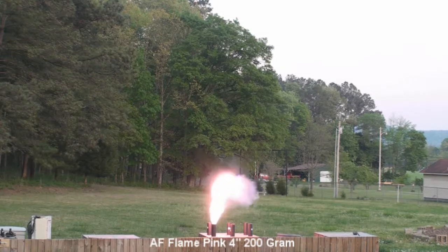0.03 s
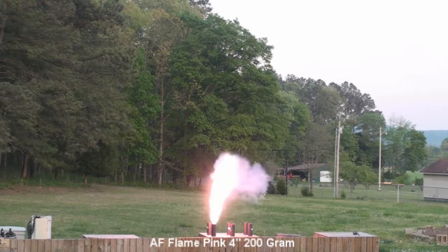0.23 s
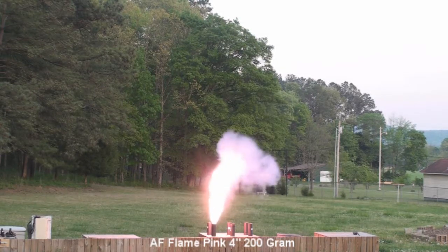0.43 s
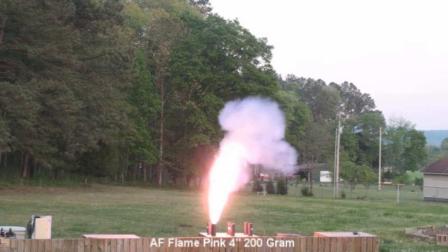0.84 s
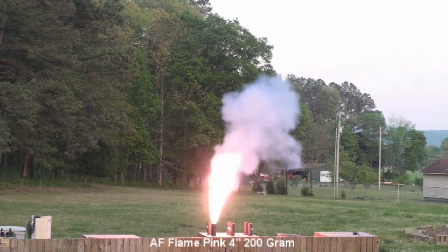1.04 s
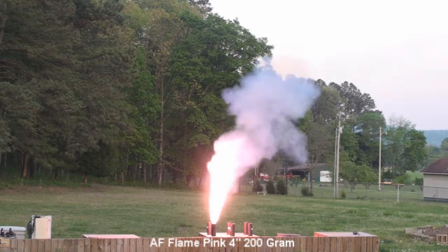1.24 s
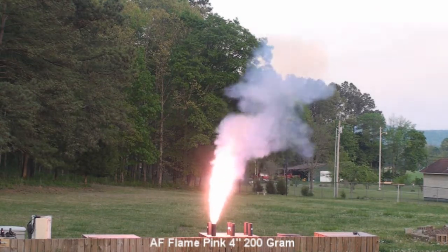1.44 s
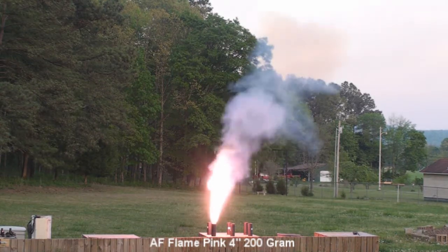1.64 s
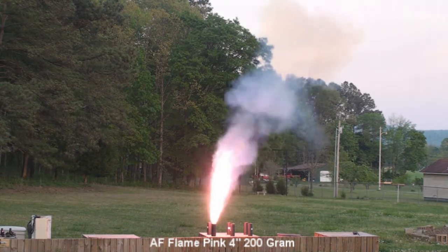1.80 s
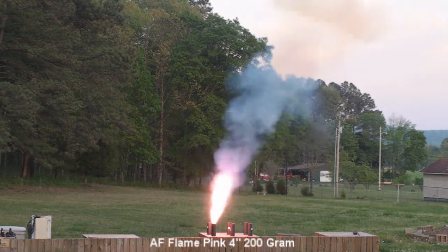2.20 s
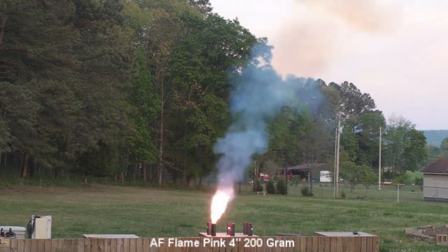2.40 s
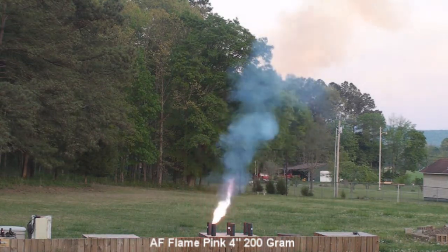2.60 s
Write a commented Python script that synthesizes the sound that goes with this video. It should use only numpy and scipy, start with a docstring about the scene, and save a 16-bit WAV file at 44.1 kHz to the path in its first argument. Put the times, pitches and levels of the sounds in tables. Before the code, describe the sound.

A firework flame whooshes and sizzles outdoors, puffing over a low rumble before fading.

```python
"""A pyrotechnic flame pot fires in a grassy yard, over a bed of outdoor air. A distant insect's trill
is faintly heard before the jet swells: the nozzle rushes and the burning powder sizzles.
For two seconds the burning gas roars low and puffs unevenly above the rumble of the fireball,
while a breeze bumps the left microphone port. As the flame dies, the trill is audible again."""
import sys
import numpy as np
from scipy.fft import rfft, irfft, next_fast_len
from scipy.io import wavfile
from scipy.ndimage import map_coordinates

SR = 44100
rng = np.random.default_rng(int(sys.argv[2]) if len(sys.argv) > 2 else 0)


def store_pcm(level_fs):
    """Save levels as 16-bit WAV."""
    pcm = np.round(np.clip(level_fs, -1, 1) * 32767).astype(np.int16)
    wavfile.write(sys.argv[1], SR, np.atleast_2d(pcm).T)


N = 121275


def roar(surges, surging, gain_db=2.5, duck=.6, weak_db=-30, weak_range_db=16, dull_hz=240):
    """Turbulent burning: a low roar that gathers into puffs and turns duller while the flame is weak."""
    # envelope of the roar (time [s], relative level [dB])
    envelope = [(0, -53), (.12, -39.5), (.22, -35), (.32, -25.5), (.44, -25), (.6, -21), (.73, -28),
                (.9, -22.5), (1.1, -25.5), (1.28, -19), (1.45, -25), (1.6, -22.5), (1.78, -21.5),
                (1.96, -21.5), (2.03, -30), (2.14, -23.5), (2.3, -34), (2.45, -32), (2.54, -45),
                (2.62, -41), (2.75, -55)]
    # tone of the burning gas (frequency [Hz], relative level [dB])
    spectrum = [(20, -38), (60, -47), (85, -26.5), (105, -9.5), (135, 2.5), (190, -8.5), (240, -5),
                (320, -16.5), (370, -14.5), (480, -17.5), (530, -23.5), (800, -58), (1500, -100)]
    level_db = curve(envelope)
    churn = amp(level_db + gain_db) * (1 - duck * surging) * noise(spectrum)
    weak = np.clip((weak_db - level_db) / weak_range_db, 0, 1)
    dull = filtered(churn, lambda hz: 1 / (1 + (hz / dull_hz) ** 4))
    left, right = at_ports(churn + weak * (dull - churn) + surges)
    left_dip_db = .4 * np.minimum(level_db - np.median(level_db), 0)  # a quiet roar leans right
    return np.array([left * amp(left_dip_db), right])


def puffs(gain_db=-4):
    """Gas surges in a few steep pressure swings. Returns the sound and a 0-1 envelope of the surges."""
    # surges of burning gas (onset [s], relative level [dB], pitch at the crest [Hz], attack [s],
    # pitch fall [Hz/s], share of the octave [0-1])
    hits = [(0.269, -18, 113.5, 0.048, 200, 0.12), (0.323, -19.5, 245, 0.027, -400, 0),
            (.478, -11, 105, .022, 0, 0.33), (.545, -14, 126, 0.021, -300, 0.032),
            (0.599, -14, 116.5, 0.017, 100, 1), (.671, -16, 126, 0.0095, 0, 1),
            (0.767, -13, 150, 0.0088, 0, 0.53), (0.81, -4, 148, .0096, 0, 0.17),
            (0.874, -11.5, 152, 0.009, 0, 0.67), (0.937, -9.5, 130.7, .012, 300, 0.6),
            (1.024, -5, 130, 0.0085, 600, 0.56), (1.067, -12, 125, 0.0063, 300, 1),
            (1.193, -6.5, 134.4, 0.014, 102, 0.37), (1.229, -15, 241.4, 0.026, 1900, 0),
            (1.325, -6, 137, 0.0082, 0, 0.27), (1.52, -4.5, 150, 0.0095, 0, 0.28),
            (1.581, -10, 123, 0.0078, 300, 1), (1.63, -8, 146, .009, -300, 0.41),
            (1.671, -11.5, 133.5, 0.012, 0, 0.96), (1.735, -8, 136, 0.01, 300, 0.47),
            (1.738, -19, 253, 0.03, 900, 0.21), (1.768, -9, 122.4, 0.022, 600, 0.17),
            (1.874, -14, 135, 0.013, 0, 0.14), (1.922, -16, 142, 0.0096, 0, 0.35),
            (1.947, -14, 248.5, 0.012, 2403, 0.23), (2.077, -19, 207, .031, 1700, 0.21),
            (2.41, -15.5, 141, 0.0061, 900, 0.36)]
    sound, surging = np.zeros((2, N + SR))
    t = np.arange(SR // 4) / SR
    start_phases = rng.uniform(0, 2 * np.pi, len(hits))
    for (onset, db, hz, attack, fall, octave), start_phase in zip(hits, start_phases):
        swell = (t / attack * np.exp(1 - t / attack)) ** 2
        phase = 2 * np.pi * np.cumsum(hz - fall * (t - attack)) / SR + start_phase
        swing = np.sin(phase) - octave * swell * np.sin(2 * phase)  # the octave steepens the front
        start = round(onset * SR)
        sound[start:start + len(t)] += amp(db + gain_db) * swell * swing
        surging[start:start + len(t)] += np.sqrt(swell)
    return np.array([sound[:N], np.zeros(N)]), np.minimum(surging[:N], 1)


def rush(flicker, surging, gain_db=2.5, flicker_db=0.85, surge_db=0.6):
    """Gas streams from the nozzle, flickering and pushing a little harder in each surge."""
    # envelope of the jet (time [s], relative level [dB])
    envelope = [(0, -81), (.1, -60), (.2, -46.5), (.34, -40.5), (.6, -37.5), (.74, -37), (1.03, -34.5),
                (1.25, -35.5), (1.45, -34), (1.75, -36.5), (2.0, -37.5), (2.18, -39), (2.32, -44.5),
                (2.44, -44.5), (2.54, -52.5), (2.75, -62)]
    # tone of the jet (frequency [Hz], relative level [dB])
    spectrum = [(250, -54), (530, -7.5), (620, -1), (780, -2.5), (1000, 0.5), (1400, -5.5), (1900, -10.5),
                (2300, -20), (3100, -14), (3900, -18), (4400, -26.5), (8000, -28.5), (16000, -102)]
    level_db = curve(envelope) + gain_db + flicker_db * flicker + surge_db * surging
    return at_ports(amp(level_db) * noise(spectrum))


def sizzle(flicker, gain_db=1.5, flicker_db=0.76, grain_db=0.75):
    """Burning powder puts a fine, slightly grainy hiss on top."""
    # envelope of the sizzle (time [s], relative level [dB])
    envelope = [(0, -66), (.12, -57), (.35, -54.5), (.62, -54), (.75, -53), (1.15, -50.5), (1.65, -50.5),
                (2.05, -51.5), (2.45, -53), (2.58, -57.5), (2.75, -66)]
    # tone of the burning powder (frequency [Hz], relative level [dB])
    spectrum = [(1500, -59), (4000, 0), (5500, 2.5), (7000, -3.5), (10500, -5.5), (12500, -7.5),
                (15500, -17)]
    level_db = curve(envelope) + gain_db + flicker_db * flicker + grain_db * wobble(600)
    return at_ports(amp(level_db) * noise(spectrum))


def rumble(left_db=-12):
    """The rising fireball fills out the low end for as long as it burns."""
    # envelope of the rumble on the right (time [s], level [dB])
    envelope = [(0, -67), (.13, -43), (.33, -35), (.7, -42), (.9, -41), (1.3, -39.5), (1.95, -31),
                (2.25, -40), (2.46, -34), (2.65, -57), (2.75, -52)]
    # tone of the fireball (frequency [Hz], relative level [dB])
    spectrum = [(15, -21), (30, 4), (50, 1), (85, 3), (120, 2), (200, -31), (600, -82)]
    return amp(curve(envelope)) * amp([[left_db], [0]]) * noise(spectrum)


def at_ports(pair):
    """The right port hears the first signal; the left hears it shifted, with the second as scatter."""
    # the flame at the left port against the right
    # (frequency [Hz], level [dB], likeness [0-1], phase lead [rad])
    image = [(50, -5, .4, 3.9), (105, -8, .9, 3.6), (135, -8, .8, 2.4), (200, -2, .4, .6),
             (240, -6, .65, 1.3), (275, -2, .9, .6), (320, 4, .3, 0), (380, -4, .4, 0), (480, -5, .45, 1.6),
             (620, -3.5, .8, .4), (1000, -4.7, .86, -.1), (1900, -5.5, .7, .3), (2350, -5, .4, .5),
             (3100, -4.7, .88, .2), (4400, -7, .35, .2), (5500, -6, .62, .2), (7000, -7, .22, 0),
             (10800, 2.5, .52, .4), (12500, -16, .46, 0)]

    def response(hz):
        likeness = np.clip(along(image, hz, column=2), 0, 1)
        direct = likeness * np.exp(1j * along(image, hz, column=3))
        scattered = np.sqrt(1 - likeness ** 2)
        return amp(along(image, hz)) * np.array([direct, scattered])
    return np.array([filtered(pair, response).sum(axis=0), pair[0]])


def walls(flame, dull_hz=4500):
    """Early reflections comb the flame and give it a faintly hollow colour."""
    # echoes off nearby surfaces (delay [s], left gain [linear], right gain [linear])
    taps = [(.00185, 0, -.08), (.00222, -.06, .06), (.00801, -.16, .17), (.01737, -.07, .11),
            (.02, 0, -.08)]

    def response(hz):
        echoes = sum(np.outer(gains, np.exp(-2j * np.pi * hz * delay)) for delay, *gains in taps)
        return 1 + echoes / (1 + (hz / dull_hz) ** 2)
    return filtered(flame, response)


def breeze():
    """Soft gusts thump the left port."""
    # gusts (peak time [s], half width [s], level [dB])
    gusts = [(.755, .022, -29.5), (1.805, .025, -28.5), (2.0, .17, -38.5)]
    # tone of wind on the port (frequency [Hz], relative level [dB])
    spectrum = [(12, -27), (30, -2), (60, -5), (110, -9), (300, -49), (1000, -90)]
    return np.array([swells(gusts) * noise(spectrum)[0], np.zeros(N)])


def air(level_db=-42):
    """A steady bed of outdoor air, its low end mostly on the right."""
    # tone of the yard (frequency [Hz], relative level [dB], left minus right [dB])
    spectrum = [(43, -9.5, -8), (122, -3, -40), (180, -1.5, -18.5), (320, -15.5, -5.5), (790, -18.5, -1.5),
                (1960, -28.5, 1.5), (3300, -31.5, 0.5), (6000, -33, -6), (11000, -36.5, 0),
                (12500, -42.5, -13), (15500, -42, -27)]
    left, right = amp(level_db) * noise(spectrum)
    return np.array([filtered(left, lambda hz: amp(along(spectrum, hz, column=2))), right])


def insect(pitch_hz=4100, half_width_hz=130, trill_hz=52, left_db=-3):
    """A distant insect's narrow, fast trill, heard faintly before the flame swells and after it dies."""
    # moments when the trill is audible (peak time [s], half width [s], level on the right [dB])
    audible = [(.03, .065, -54.5), (2.68, .1, -60)]
    white = rng.standard_normal((2, N))
    band = filtered(white, lambda hz: 1 / (1 + ((hz - pitch_hz) / half_width_hz) ** 2))
    pulse_hz = trill_hz * (1 + 0.099 * wobble(8.9))
    pulses = 1 + 0.78 * np.sin(2 * np.pi * np.cumsum(pulse_hz) / SR)
    return amp([[left_db], [0]]) * swells(audible) * unit(band * pulses)


def amp(db):
    """Decibels to gain."""
    return 10 ** (np.asarray(db) / 20)


def unit(x):
    """Scaled to rms 1."""
    return x / np.sqrt(np.mean(x ** 2) + 1e-20)


def along(table, hz, column=1):
    """One column of a table, read on log frequency."""
    rows = np.array(table, float)
    return np.interp(np.log(hz + 1), np.log(rows[:, 0] + 1), rows[:, column])


def curve(rows):
    """One value per sample from (time [s], value) rows."""
    return np.interp(np.arange(N) / SR, *np.transpose(rows))


def swells(rows):
    """A gain envelope of bell-shaped swells from (peak time [s], half width [s], level [dB]) rows."""
    t = np.arange(N) / SR
    return sum(amp(db) * np.exp(-.5 * ((t - peak) / width) ** 2) for peak, width, db in rows)


def wobble(rate):
    """A smooth random curve, rate knots a second."""
    return map_coordinates(rng.standard_normal(4096), [np.arange(N) * rate / SR], mode="wrap")


def filtered(x, response):
    """x through a filter given as a complex response of frequency."""
    size = next_fast_len(N + SR // 2)
    return irfft(rfft(x, size) * response(np.fft.rfftfreq(size, 1 / SR)), size)[..., :N]


def noise(spectrum):
    """Two unrelated noises of rms 1 with this spectrum."""
    return unit(filtered(rng.standard_normal((2, N)), lambda hz: amp(along(spectrum, hz))))


def scene():
    """The flame and its reflections over the yard; rush and sizzle share one flicker."""
    flicker = wobble(39.55)
    surges, surging = puffs()
    flame = roar(surges, surging) + rush(flicker, surging) + sizzle(flicker)
    return walls(flame) + rumble() + breeze() + air() + insect()


def record(dry, top_hz=15780):
    """A brick-wall low-pass takes off the very top."""
    return filtered(dry, lambda hz: hz < top_hz)


dry = scene()
out = record(dry)
store_pcm(out)
```